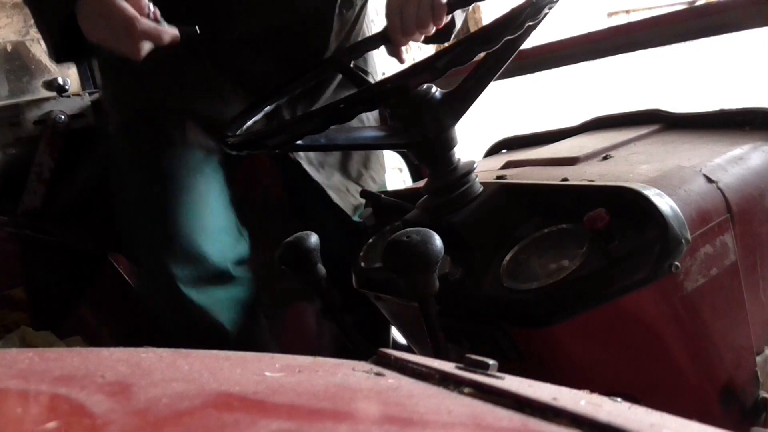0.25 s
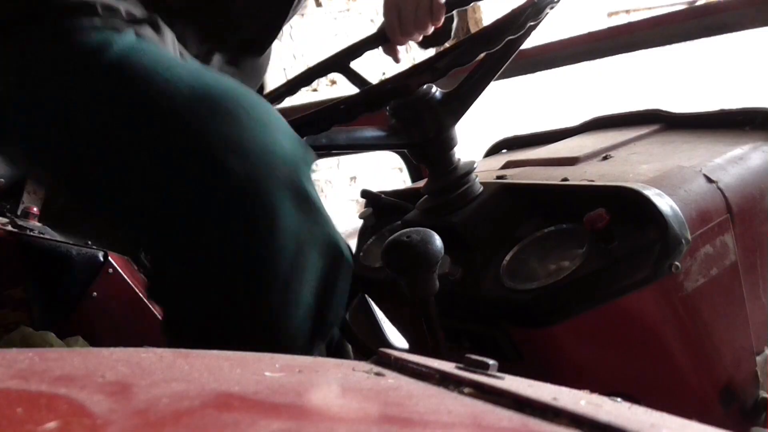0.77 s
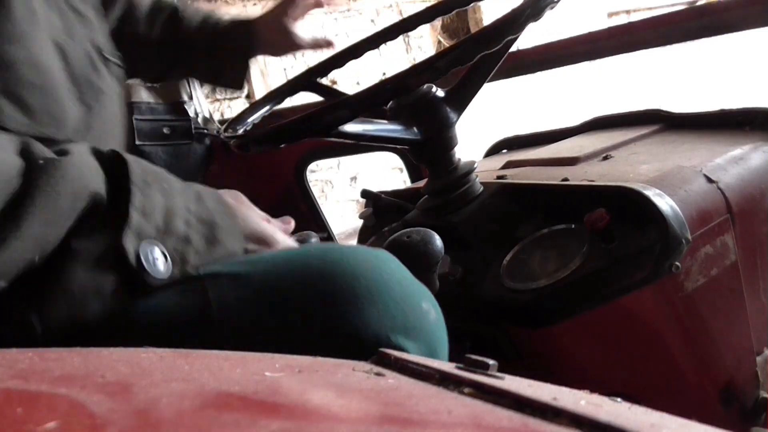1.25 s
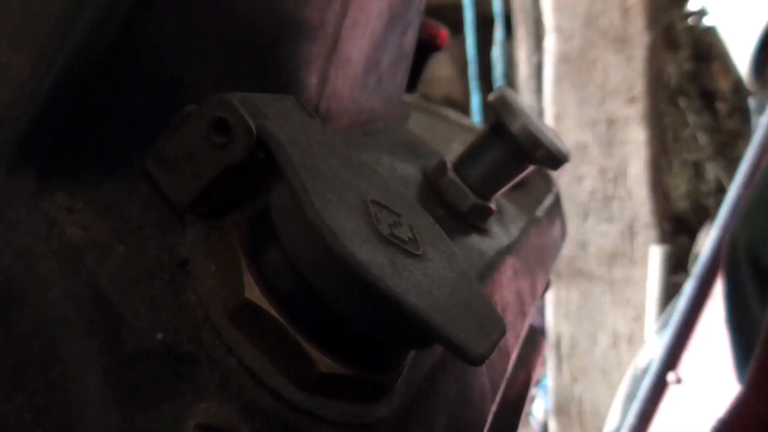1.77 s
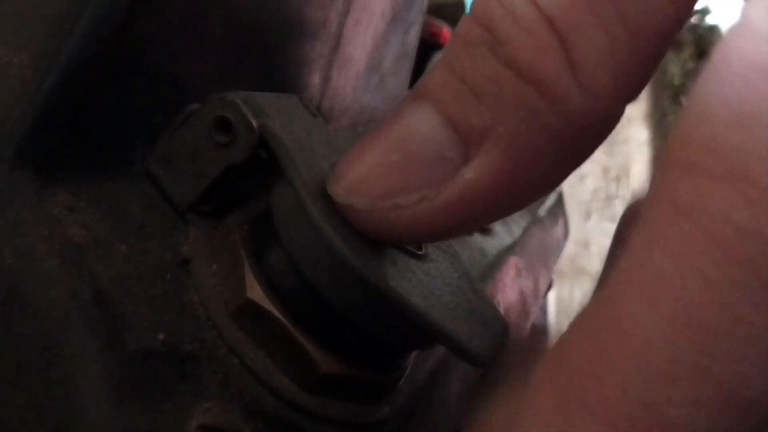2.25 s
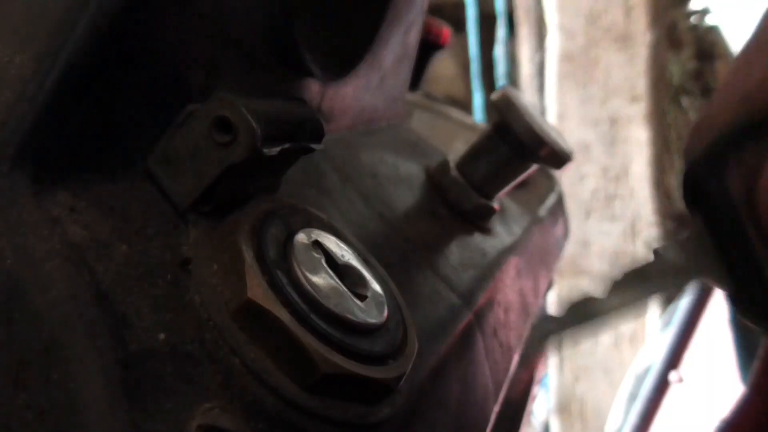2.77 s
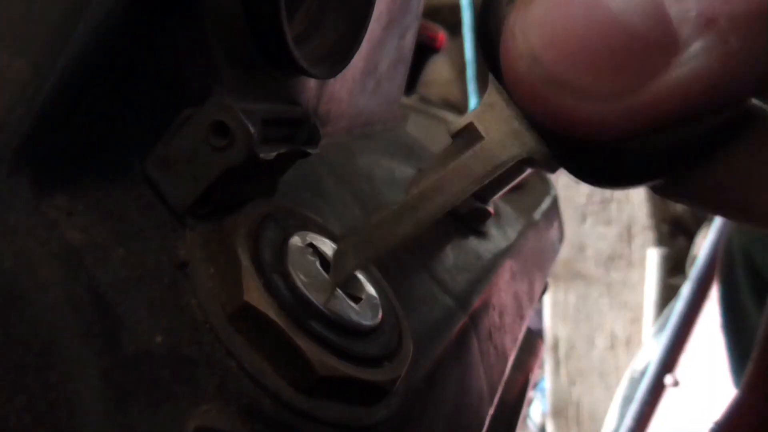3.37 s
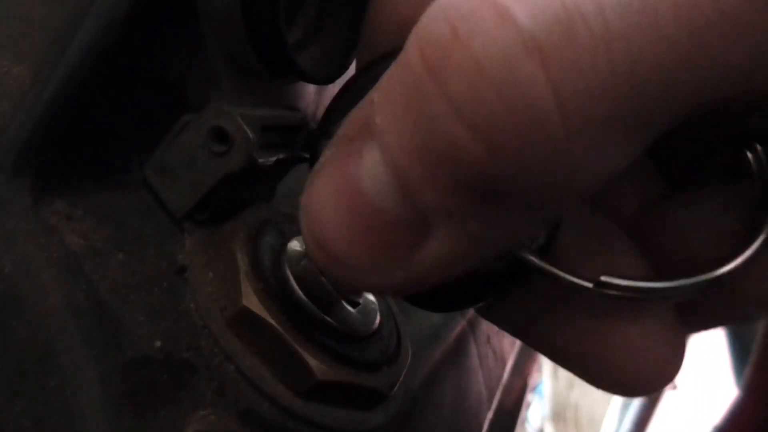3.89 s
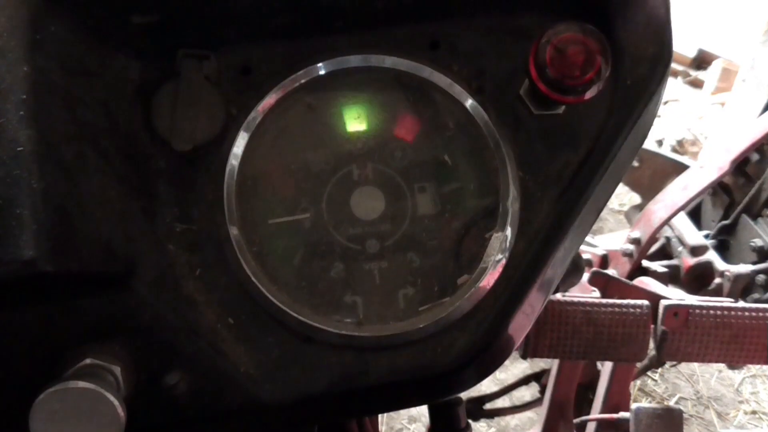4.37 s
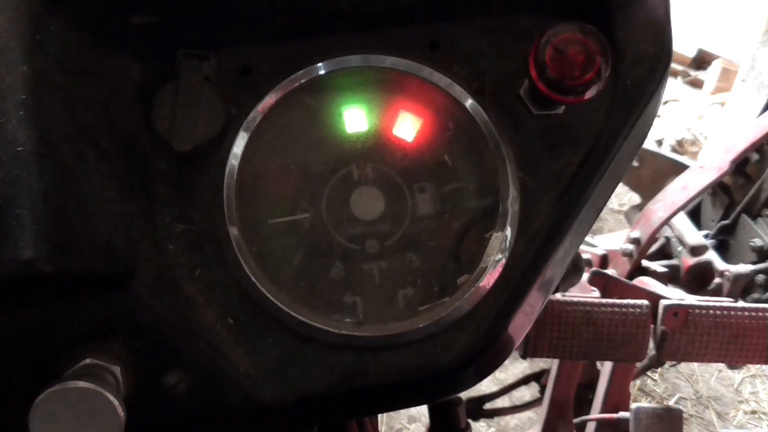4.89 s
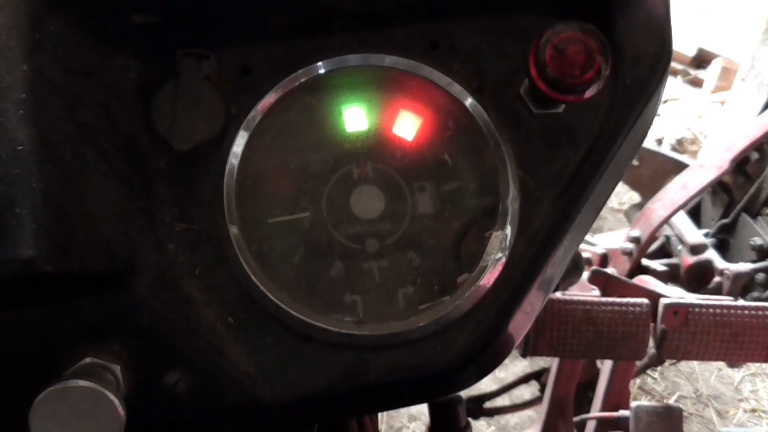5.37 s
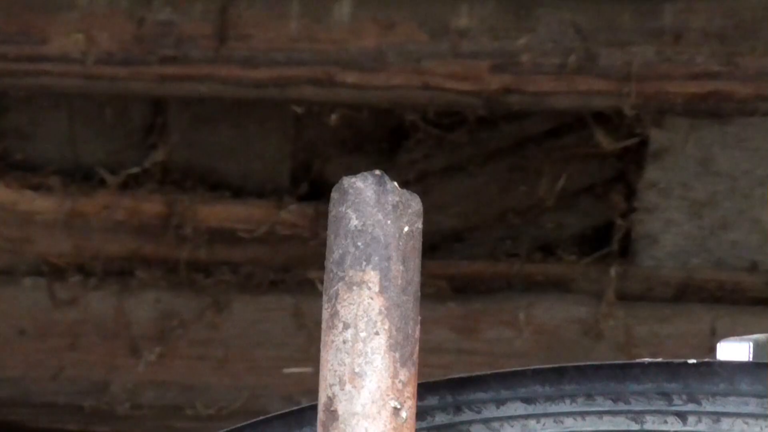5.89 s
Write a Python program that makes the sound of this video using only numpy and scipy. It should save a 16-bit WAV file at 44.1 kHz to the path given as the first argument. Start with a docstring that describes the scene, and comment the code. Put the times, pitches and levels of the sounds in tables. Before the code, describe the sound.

From 0 to 1.6 seconds a driver climbs onto a tractor in a barn. Boots and knees knock hollow steel, strongest near 0.1 and 1.15, with low wavering plate booms, scuffs, cloth rustle, brief squeaks and a tiny key jingle; the barn answers shortly. A hard cut moves close to the lock: near quiet, faint finger rubs from 2.05, then a rough scrape and squeak as the cap flips around 2.5-2.75. From 3.0 the key taps and rattles brightly, slides over ticking pins near 3.6 and snaps round at 3.97. After a cut at 4.1, small clicks lead to a strong switch snap at 4.37; soft hiss and a barely audible high whine follow around 4.7-5.4, then more clicks and handling from 5.5. At 5.8 another cut leaves barn air until the starter bites around 6.03 with a hard knock and coarse grinding, ending at 6.14.

```python
"""A driver climbs onto a tractor in a barn: boots knock and scuff the steel floor, clothes rub the seat, keys jingle.
Knocks are contact bursts that ring panels and sheet; booms are decaying notes, scuffs filtered noise, squeaks tones.
Then close by, fingers rub and flip a squeaking lock cap, fumble a key into the lock and click it round.
A faint whine of narrow noise bands follows; last the starter bites, as grinding noise and one knock.
Four microphone positions follow one another with hard cuts; barn air and microphone hiss lie under all."""
import sys
import numpy as np
from scipy import signal
from scipy.fft import rfft, irfft, next_fast_len
from scipy.io import wavfile
from scipy.ndimage import uniform_filter1d, map_coordinates

SR = 44100
rng = np.random.default_rng(int(sys.argv[2]) if len(sys.argv) > 2 else 0)


def put_to_file(sound):
    """Save the sound as 16-bit audio at rate SR, in the file named by the first command-line argument."""
    columns = np.atleast_2d(sound).T  # one column per channel
    safe = np.clip(columns, -1, 1)
    whole_steps = np.round(safe * 32767)
    wavfile.write(sys.argv[1], SR, whole_steps.astype(np.int16))


N = 270774
T = np.arange(N) / SR  # time in seconds

# Edges of the four microphone positions. Each entry: time in seconds, from the start to the end.
CUTS = [0, 1.644, 4.122, 5.803, 6.14]
# Colour of a knocked or rubbed panel. Each row: frequency in Hz, relative density in dB per Hz.
PANEL = [(210, -16), (350, -6.5), (595, 0), (1520, -3), (2130, -8), (2740, -19.5), (3000, -20.5),
         (3900, -74.5)]
# Colour of a small hard tick. Each row: frequency in Hz, relative density in dB per Hz.
TICK = [(1530, -52.5), (2300, -2), (3000, 1), (4860, 6.5), (5990, 1), (9000, -7.5), (12800, -21),
        (16500, -36.5)]


def amp(db):
    """Decibels to an amplitude factor."""
    return 10 ** (np.asarray(db) / 20)


def unit(x):
    """Scale to an rms of 1."""
    return x / np.sqrt(np.mean(x ** 2) + 1e-20)


def along(points, hz):
    """Interpolate (Hz, value) points on a log frequency axis."""
    f, v = np.transpose(points)
    return np.interp(np.log(hz + 1), np.log(f + 1), v)


def position_of_samples():
    """Index of the microphone position in force at every sample."""
    return np.searchsorted(CUTS[1:-1], T)


def add(track, s, sound):
    """Lay a sound on the track at s seconds; the next cut ends it."""
    next_cut = min(c for c in CUTS if c > s)
    i, end = round(s * SR), round(next_cut * SR)
    track[..., i:end][..., :sound.shape[-1]] += sound[..., :end - i]


def curves(rows):
    """One gain per sample for each dB column after the time column, silent outside the table."""
    s, *cols = np.transpose(rows)
    return np.array([amp(np.interp(T, s, c, left=-150, right=-150)) for c in cols])


def strokes(rows):
    """Swell-and-fade gains, one for each dB column after start and length; the swell is quicker than the fade."""
    gains = np.zeros((len(rows[0]) - 2, N))
    for s, length, *db in rows:
        u = np.linspace(0, 1, round(length * SR))
        swell = np.sin(np.pi * u ** 0.63) ** 2.0
        add(gains, s, amp(db)[:, None] * swell)
    return gains


def filtered(x, response):
    """Multiply the spectrum of x by a complex response of frequency."""
    m = next_fast_len(N + SR // 2)
    return irfft(rfft(x, m) * response(np.fft.rfftfreq(m, 1 / SR)), m)[..., :N]


def shape(spectrum):
    """Gain as a function of frequency, from (Hz, dB) points."""
    return lambda hz: amp(along(spectrum, hz))


def resonances(modes):
    """Causal response of a set of (Hz, width in Hz, dB) resonances, in alternating polarity."""
    def response(f):
        return sum((-1) ** k * amp(db) * 1j * f * width / (hz * hz - f * f + 1j * f * width)
                   for k, (hz, width, db) in enumerate(modes))
    return response


def struck(x, spectrum):
    """Pass x through the causal (minimum-phase) version of a spectrum scaled to unit energy."""
    level_db = np.maximum(along(spectrum, np.fft.rfftfreq(4096, 1 / SR)), -70)
    cepstrum = irfft(np.log(amp(level_db)))
    cepstrum[1:2048] *= 2  # fold the acausal half onto the causal one
    cepstrum[2049:] = 0
    h = irfft(np.exp(rfft(cepstrum)))
    return signal.fftconvolve(x, h / np.linalg.norm(h))[:N]


def spread(pair, gain):
    """Two unrelated signals become left and right, with a likeness that depends on frequency."""
    # Likeness of the two ports. Each row: frequency in Hz, left-right correlation.
    likeness = [(60, 0.44), (240, 1), (950, 0.77), (3770, 0.64), (15000, 0.48)]

    def turn(hz):
        return np.arccos(np.clip(along(likeness, hz), -1, 1)) / 2
    mid, side = filtered(pair, lambda hz: gain(hz) * [np.cos(turn(hz)), np.sin(turn(hz))])
    return np.array([mid + side, mid - side])


def scrape(gain, grain_db, rate):
    """Stereo friction noise of rms 1: uneven grip makes its strength wander, with rate new values a second."""
    grip = map_coordinates(rng.standard_normal(int(N * rate / SR) + 4), [T * rate])
    return unit(spread(rng.standard_normal((2, N)) * amp(grain_db * grip), gain))


def ringing(modes, held):
    """One damped sine for each (Hz, dB, t60) mode; held scales all the ring times."""
    hz, db, t60 = np.transpose(modes)[..., None]
    t = T[:SR * 2 // 3]
    rise = 1 - np.exp(-t * hz / 3)
    return amp(db - 60 * t / (t60 * held)) * rise * np.sin(2 * np.pi * hz * t)


def ring(sines):
    """Sum the modes at new strengths for each blow."""
    return amp(rng.normal(0, 1.2, size=len(sines))) @ sines


def barn_air():
    """Barn air and microphone hiss: steady shaped noise."""
    # Colour of the air and hiss. Each row: frequency in Hz, relative level in dB.
    air_colour = [(15, -42.5), (25, -7), (121, 3), (197, -9), (496, -10.5), (1830, -19.5), (2210, -18.5),
                  (2980, -25.5), (3230, -21.5), (8600, -26), (9330, -22), (14800, -28), (16500, -43.5)]
    return amp(-61.5) * scrape(shape(air_colour), grain_db=.5, rate=5)


def cab(f):
    """Response of the floor plates; heavy steel passes little treble."""
    # Floor plates and mudguards. Each row: resonance in Hz, width in Hz, relative level in dB.
    plate_modes = [(77, 110, -4.5), (164, 43, 3), (223, 28, 2.5), (270, 48, 1), (335.6, 43.6, 2.5),
                   (392, 21, -2), (435.4, 25, 5.5), (530, 290, -6)]
    return resonances(plate_modes)(f) / (1 + 1j * f / 700) ** 2


def movement():
    """Weight shifts jolt the plates, cloth rustles; hands and boots rub when weight and cloth move together."""
    # Single shifts of boot, knee, seat and hand.
    # Each row: start in seconds, length in seconds, rumble in dB, rustle in dB.
    shifts = [(0, 0.032, -30.5, -53), (.05, 0.12, -77, -42.5), (.13, 0.11, -29.5, -59),
              (.19, 0.15, -26, -55.5), (.27, 0.17, -33.5, -60), (.39, 0.049, -30.5, -53),
              (.47, 0.15, -36.5, -48), (.755, 0.11, -39.5, -91), (.9, 0.081, -31.5, -50),
              (.97, 0.098, -34.5, -62), (1.06, 0.25, -36.5, -35.5), (1.12, 0.1, -24, -29.5),
              (1.24, 0.13, -39, -44.5), (1.34, 0.13, -35, -46), (3.14, 0.21, -55, -59),
              (3.58, 0.13, -30, -42.5)]
    # Steady movement at the first three positions: climbing in, hands at the lock, hands at the switch.
    # One list per position. Each row: time in seconds, rumble in dB.
    moving = [
        [(0, -34), (.3, -33.5), (.58, -35.5), (.72, -42.5), (1.05, -43), (1.22, -38), (1.5, -33.5),
         (1.644, -40)],
        [(1.65, -58), (2.0, -53), (2.5, -52), (2.9, -51), (3.1, -49.5), (3.55, -49.5), (3.75, -55.5),
         (4.12, -56)],
        [(4.125, -72), (4.3, -60.5), (4.6, -58), (4.85, -76), (5.3, -77.5), (5.5, -57.5), (5.65, -52),
         (5.8, -48)],
    ]
    # Rustle over rumble in that steady movement. Each entry: dB, by position.
    cloth_db = [-16, -11.5, -11.5]
    # Rubbing over the geometric mean of rumble and rustle. Each entry: dB, by position.
    rub_db = [0.34, 5.8, 3.5, 4.6]
    # Colour of cloth. Each row: frequency in Hz, relative level in dB.
    cloth_colour = [(1470, -29.5), (2500, -10.5), (3770, -1), (4280, 1.5), (8840, -7), (15700, -24),
                    (16500, -36)]

    steady = [curves(rows) * amp([[0], [db]]) for rows, db in zip(moving, cloth_db)]
    rumble, rustle = strokes(shifts) + sum(steady)
    rub = np.sqrt(rumble * rustle) * amp(rub_db)[position_of_samples()]
    return (rumble * scrape(cab, grain_db=2.5, rate=45)
            + rub * scrape(shape(PANEL), grain_db=2.2, rate=110)
            + rustle * scrape(shape(cloth_colour), grain_db=1.5, rate=120))


def squeaks():
    """Stick-slip of hinge and seat: wavering, fluttering tones, the lower ones with a second partial; one short
    high tone rings with a knock."""
    # Hinge and seat squeaks, and one short high ring that sounds with the knock at 0.265 s. # Each row: start
    # in seconds, length in seconds, from Hz, to Hz (both before the waver), level in dB before flutter.
    squeak_rows = [(0.05, 0.024, 5500, 5020, -41.5), (0.051, 0.015, 5300, 2297, -34),
                   (0.26, 0.026, 4247, 4200, -27), (0.07, 0.03, 1850, 2215, -33),
                   (0.078, 0.024, 2630, 3680, -38.5), (0.097, 0.014, 6460, 6600, -37),
                   (0.474, 0.036, 2200, 3100, -41), (0.489, 0.077, 799, 897, -34.5),
                   (0.544, 0.039, 1470, 1734, -33.5), (1.565, 0.045, 778, 823, -34),
                   (2.534, 0.05, 4800, 4650, -54.5), (2.583, 0.05, 12000, 10000, -48),
                   (2.598, 0.058, 680, 561, -38), (2.593, 0.042, 7440, 7320, -33),
                   (2.694, 0.067, 6600, 6480, -51.5), (2.695, 0.063, 699, 738, -35)]
    tones = np.zeros(N)
    for s, length, from_hz, to_hz, db in squeak_rows:
        n = round(length * SR)
        waver, flutter = uniform_filter1d(rng.standard_normal((2, n)), size=60)
        hz = np.linspace(from_hz, to_hz, n) * (1 + .15 * waver)
        phase = 2 * np.pi * np.cumsum(hz) / SR
        overtone = (to_hz < 5000) * amp(-15.5) * np.sin(2 * phase)
        level = amp(db + 38.3 * flutter) * np.sqrt(np.hanning(n))
        add(tones, s, level * (np.sin(phase) + overtone))
    return tones


def contacts():
    """Every contact as (s, level dB, tick over it dB, edge over tick dB, ping Hz, thud over level dB)."""
    # Heavy knocks, boots and knees on the cab, last the pinion on the flywheel.
    # Each row: time in seconds, level in dB, tick over it in dB, ping in Hz, thud over the level in dB.
    knocks = [(.126, -10, -10.5, 1390, 12), (.238, -34, -7, 2300, -19), (0.265, -16, -2.5, 1660, -19),
              (.401, -19.5, -11.5, 1390, 3), (0.75, -23.5, -11, 1000, -18.5),
              (0.853, -31.5, -17.5, 900, -2.5), (1.139, -16, 0, 1500, -15), (1.148, -11.5, -20.5, 1090, -7),
              (1.461, -25, -9.5, 1360, -22), (6.06, -13, -0.5, 1500, 0)]
    # Key and switch tap on steel and bounce once.
    # Each row: time in seconds, level in dB, tick over it in dB, edge over the tick in dB, ping in Hz.
    taps = [(2.376, -39, 0.5, 2.5, 1500), (2.975, -13, -9.5, -1.5, 710), (3.138, -24, -22, -9, 974),
            (3.1932, -17.5, -22.5, -25, 1480), (3.2347, -19, -0.5, -12, 723),
            (3.2589, -19.5, -9.5, -18.5, 1500), (3.334, -8, -15, -0.5, 2054),
            (3.42, -17.5, -9.5, -8.5, 2160), (3.461, -29.5, -19.5, -1.5, 594), (3.513, -3.5, -4.5, -6, 910),
            (3.6457, -15.5, -10.5, -4, 1200), (3.65, -12.5, 3.5, -3.5, 1500), (3.725, -35, -3, -13, 1500),
            (3.769, -34, -15.5, 2, 2170), (4.162, -24, -16.5, -21, 1750), (4.187, -33.5, -9, -12, 1840),
            (4.435, -26, -15, 5.5, 1770), (4.475, -37.5, -20.5, -9.5, 2070), (4.603, -40, -13.5, 0, 1800),
            (5.477, -39.5, -16.5, 6.5, 1710), (5.545, -32, -19.5, -9, 815),
            (5.582, -12.5, -2.5, -6.5, 1890), (5.654, -38, 6.5, -7, 1710), (5.768, -17, -3, -21, 1900)]
    # Sprung parts of the lock let go with a tick, then snap home.
    # Each row: time of the snap in seconds, level in dB, tick over it in dB, edge over the tick in dB, ping in Hz.
    snaps = [(3.0088, -10.5, -14, 4, 1000), (3.433, -9.5, -16, -27.5, 1184), (3.6224, -9.5, -16, 0.5, 1490),
             (3.636, -13, -5.5, -7.5, 1230), (3.97, -5.5, -6, -5, 873), (4.366, -4, -10, -22, 1061),
             (5.6842, -21, -14, -6, 1700)]
    bounce_s, bounce_db = 0.0069, -17
    let_go_s, let_go_db, let_go_tick_db = 0.0047, -8.5, 6  # the let-go comes before the snap
    knock_edge_db = -7.5
    lock_thud_db = -10.5  # small parts hardly move the plates

    bounces = [(s + bounce_s, db + bounce_db, *rest) for s, db, *rest in taps]
    let_gos = [(s - let_go_s, db + let_go_db, tick_db + let_go_tick_db, *rest)
               for s, db, tick_db, *rest in snaps]
    # the key slides in over ten pins, which tick in quick uneven succession
    pin_times = np.linspace(3.584, 3.665, num=10)
    pins = [(s + 0.0014 * late, -34.5 - 2 * size, 1.5, 0, 1500)
            for s, (late, size) in zip(pin_times, rng.standard_normal((10, 2)))]
    small = taps + bounces + pins + snaps + let_gos
    heavy = [(*row, knock_edge_db, hz, thud_db) for *row, hz, thud_db in knocks]
    return heavy + [(*row, lock_thud_db) for row in small]


def blows():
    """Each blow is a sharp contact that rattles on briefly, heard as tick, ping, panel knock, thud and sheet ring."""
    # Dashboard sheet. Each row: frequency in Hz, relative level in dB, t60 in seconds when left free.
    dash_modes = [(316, -10, 1.0), (371, -11, 0.4), (443, -2, 0.55), (608, -16, .55), (1367, -17.5, 1.4),
                  (1836, -17.5, 1.3), (1845, -21, 1.3), (2170, -28, 1.6)]
    # Share of that ring time left; at the lock a hand rests on the sheet. Each entry: factor, by position.
    dash_held = [0.92, 0.44, 0.76, 1]
    # How loudly the sheet rings over the blow. Each entry: dB, by position.
    dash_db = [-45, -32, -28, -63]
    # Key ring. Each row: frequency in Hz, relative level in dB, t60 in seconds when left free.
    key_modes = [(12830, 4, 0.16), (13150, 0, 0.25)]
    # Jingles of the key ring. Each row: time in seconds, level in dB.
    jingles = [(0.322, -45), (4.436, -49), (4.602, -57), (5.582, -50)]
    # Key blade and pins. Each row: frequency in Hz, relative level in dB, t60 in seconds.
    blade_modes = [(4800, -2.5, 0.0093), (6600, -10.5, 0.016), (8070, -8, 0.0087)]
    # The sharpest part of a tick. Each row: frequency in Hz, relative density in dB per Hz.
    edge_colour = [(5000, -41.5), (8000, 10.5), (10000, 14.5), (13000, 6), (16500, -2.5)]
    # Rattle after a blow. Each entry: t60 in seconds, by position.
    rattle_s = [0.12, 0.03, 0.059, 0.17]
    # the first instant of contact: knock over the blow's level at each position, and tick over the tick's
    spike_db, tick_spike_db = [11, 12, 11, 8], 8
    blade_db = -6  # over the tick
    ping_db, ping_s = 1, 0.015  # the struck part's own short note: dB over the blow, t60 in seconds

    knock, thud, sheet = np.zeros((3, N))
    tick, edge = np.zeros((2, 2, N))
    t = T[:SR // 5]
    blade = ringing(blade_modes, 1)[:, :len(t)]
    dash = [ringing(dash_modes, held) for held in dash_held]
    keys = ringing(key_modes, 0.75)
    rise = 1 - np.exp(-t / 0.00052)
    spike = np.arange(len(t)) == [[20], [21]]  # reaches the left port one sample sooner
    for s, db, tick_db, edge_db, ping_hz, thud_db in contacts():
        place = np.searchsorted(CUTS, s) - 1
        force = rise * (amp(-60 * t / 0.0044) + 0.56 * amp(-60 * t / rattle_s[place]))
        chatter = np.sign(rng.standard_normal((3, len(t))))
        treble = chatter[1] + np.outer([.4, -.4], chatter[2])  # differs from port to port
        first_tick = amp(tick_spike_db) * spike
        add(knock, s, amp(db) * (.5 * force * chatter[0] + amp(spike_db[place]) * spike[0]))
        add(tick, s, amp(db + tick_db) * (force ** 1.35 * treble + first_tick))
        # the edge dies sooner than the tick
        add(edge, s, amp(db + tick_db + edge_db) * (force ** 1.74 * treble + first_tick))
        add(thud, s, amp(db + thud_db) * force)  # the plates feel one push
        add(sheet, s, amp(db + dash_db[place]) * ring(dash[place]))
        ping = rise * np.sin(2 * np.pi * ping_hz * t)
        add(sheet, s, amp(db + ping_db - 60 * t / ping_s) * ping)
        blade_note = ring(blade * amp(rng.normal(0, 3.5, size=(3, 1))))
        add(sheet, s, (place > 0) * amp(db + tick_db + blade_db) * blade_note)  # not at the first position
    for s, db in jingles:
        add(sheet, s, amp(db) * ring(keys))

    plates = filtered(thud, lambda f: cab(f) * 1j * f / (120 + 1j * f))
    ticks = np.array([struck(a, TICK) + struck(b, edge_colour) for a, b in zip(tick, edge)])
    return struck(knock, PANEL) + plates + sheet + ticks


def barn(x):
    """Each frequency of the barn's answer dies at its own speed; a cut ends the tail."""
    # Decay of the barn. Each row: frequency in Hz, t60 in seconds before the factor of the position.
    decay = [(200, 0.18), (2000, 0.054), (10000, 0.023)]
    # the answer at each position: level in dB, factor on t60
    answer_db, longer_by = [-4.5, -13, -14.5, -10], [1.5, 1.7, 3, 0.84]
    wet = np.zeros((2, N))
    for start, end, db, longer in zip(CUTS, CUTS[1:], answer_db, longer_by):
        hz, t, z = signal.stft(rng.standard_normal((2, SR // 2)), SR, nperseg=256)
        t60 = longer * along(decay, hz)[:, None]
        tail = signal.istft(z * amp(-60 * t / t60), SR, nperseg=256)[1]
        part = x[None, round(start * SR):round(end * SR)]
        add(wet, start, amp(db) * signal.fftconvolve(part, tail / np.linalg.norm(tail[0]), axes=1))
    return wet


def booms():
    """Weight bends one plate, which sounds its own soft note, wavering as the plate settles."""
    # Plate notes. Each row: start in seconds, centre frequency in Hz, level in dB before rise and decay.
    plate_notes = [(.17, 180, -20.5), (0.267, 293.6, -13.5), (0.504, 309, -19), (.6, 570, -33),
                   (0.778, 366, -27), (.925, 296, -18), (.995, 196, -21), (1.161, 372, -12.5),
                   (1.161, 1450, -22.5), (1.184, 189, -18.5), (1.262, 1190, -29), (1.303, 1480, -31),
                   (1.355, 370, -19), (1.391, 314, -24), (1.463, 172, -21)]
    rise_s, t60_s = 0.007, 0.17
    out, t = np.zeros(N), T[:SR // 3]
    for s, hz, db in plate_notes:
        waver = unit(uniform_filter1d(rng.standard_normal(len(t)), size=500))
        phase = 2 * np.pi * np.cumsum(hz * (1 + .025 * waver)) / SR
        add(out, s, amp(db - 60 * t / t60_s) * (1 - np.exp(-t / rise_s)) * np.sin(phase))
    return out


def lock_cap():
    """Rough rubs on the lock cap swell and fade: friction noise through the cap's resonances."""
    # Rubs of finger and hinge on the cap. Each row: start in seconds, length in seconds, level in dB.
    rubs = [(2.056, 0.091, -48.5), (2.25, 0.065, -42), (2.53, 0.27, -36.5), (2.585, 0.054, -34),
            (2.68, 0.23, -42.5)]
    # Lock cap and its seat. Each row: resonance in Hz, width in Hz, relative level in dB.
    cap_modes = [(434, 310, -2.5), (746, 270, 0.5), (1480, 190, -3.5), (4620, 1700, -20.5),
                 (6680, 780, -11.5), (7800, 1500, -15.5), (9080, 440, -13.5), (11900, 3000, -28)]
    return strokes(rubs) * scrape(resonances(cap_modes), grain_db=2.2, rate=260)


def whine():
    """A faint electric whine once the switch is on: three fuzzy high lines of narrow noise."""
    lines = resonances([(hz, 120, 0) for hz in [9300, 10350, 11200]])
    swell = strokes([(4.72, .65, -80)])  # start in seconds, length in seconds, dB
    return swell * scrape(lines, grain_db=3, rate=20)


def starter():
    """Gear teeth grind as the motor takes the load: resonant noise with a brighter layer."""
    # Starter pinion grinding into the flywheel.
    # Each row: time in seconds, level in dB, bright layer over it in dB.
    bite = [(5.985, -54, -39), (6.015, -49, -4), (6.03, -25.5, -2.5), (6.065, -18.5, -11),
            (6.1, -23, -15.5), (6.14, -29.5, -13.5)]
    # Starter and bell housing. Each row: resonance in Hz, width in Hz, relative level in dB.
    housing_modes = [(336.4, 55, 2), (766, 68, 6), (1330, 660, 0), (1890, 800, -2)]
    level, bright = curves(bite)
    grind = scrape(resonances(housing_modes), grain_db=2.0, rate=150)
    return level * (grind + bright * scrape(shape(TICK), grain_db=1.5, rate=220))


def scene():
    """Blows lean left or right by position and wake the barn; every other source is laid in as it is."""
    # Left over right for blows. Each entry: dB, by position.
    lean_db = [0.23, 1.1, 3.5, 0.86]
    hits = blows()
    left_db = np.array(lean_db)[position_of_samples()]
    close = hits * amp([left_db / 2, -left_db / 2])
    answer = spread(barn(hits.mean(axis=0)), np.ones_like)
    return (barn_air() + movement() + squeaks() + close + answer + booms()
            + lock_cap() + whine() + starter())


def record(dry):
    """Two close ports hear slightly shifted phase; deep bass is lost, nothing is kept above the band limit."""
    # Phase between the ports. Each row: frequency in Hz, radians by which the left port leads.
    port_lead = [(0, 0.0089), (860, 0.44), (1290, 0.43), (11900, 0.006)]
    bass_hz, top_hz = 62, 16800

    def microphone(hz):
        ports = np.exp(.5j * np.outer([1, -1], along(port_lead, hz)))
        return ports * (hz < top_hz) * (1j * hz / (bass_hz + 1j * hz)) ** 3
    dry = dry / (1 + np.abs(dry / .85) ** 4) ** (1 / 4)  # the loudest peaks saturate softly
    return filtered(dry, microphone)


dry = scene()
out = record(dry)
put_to_file(out)
```